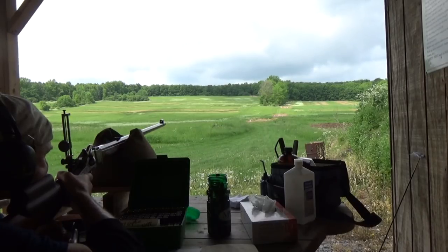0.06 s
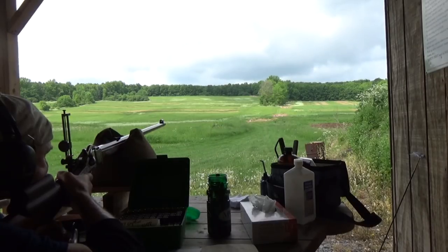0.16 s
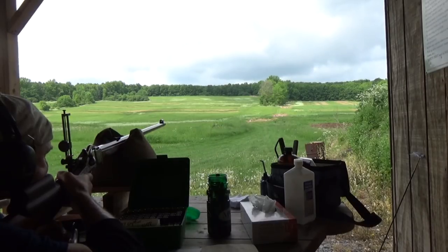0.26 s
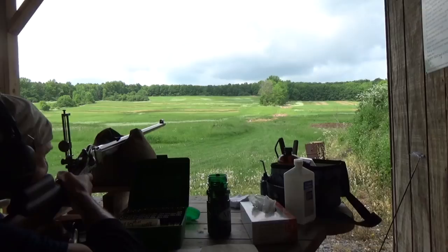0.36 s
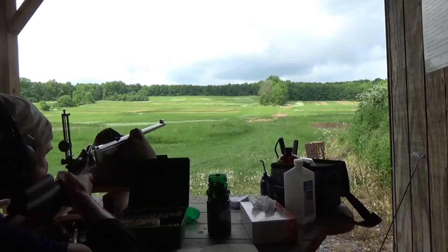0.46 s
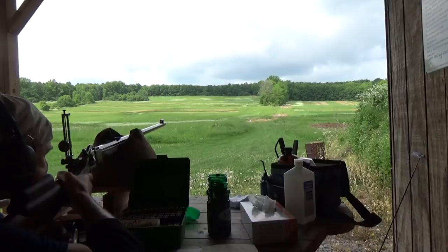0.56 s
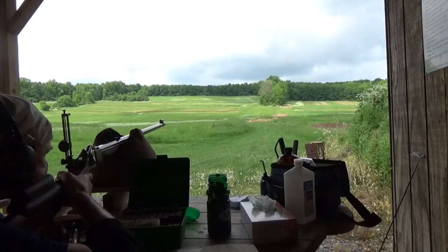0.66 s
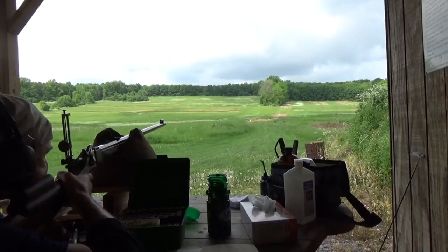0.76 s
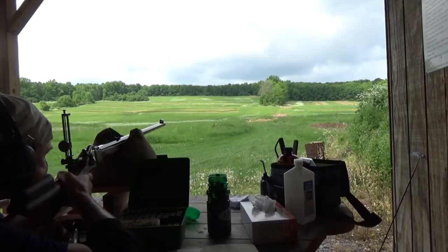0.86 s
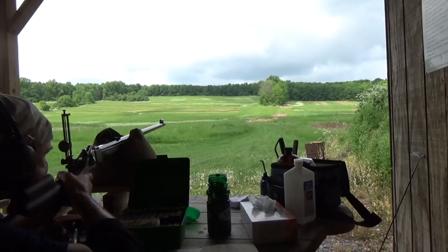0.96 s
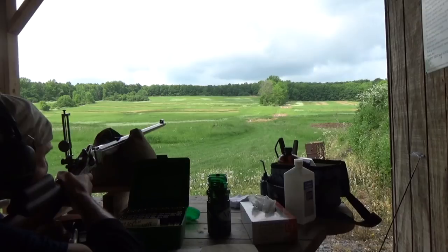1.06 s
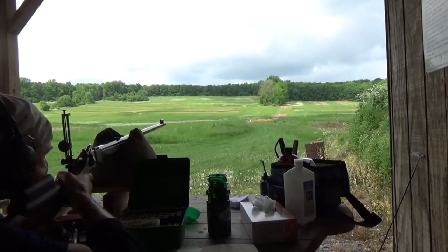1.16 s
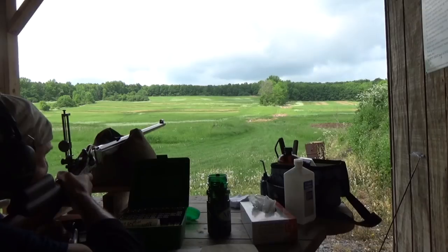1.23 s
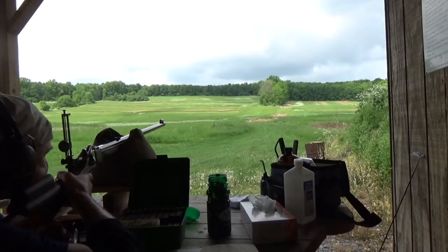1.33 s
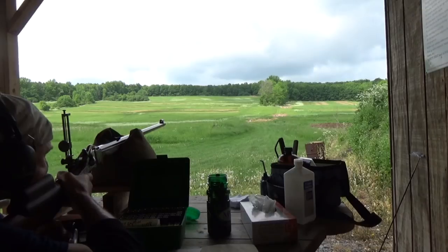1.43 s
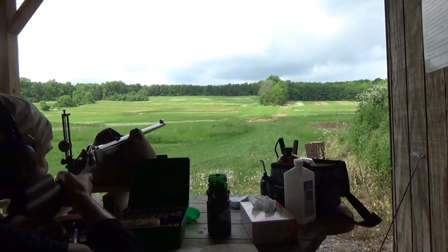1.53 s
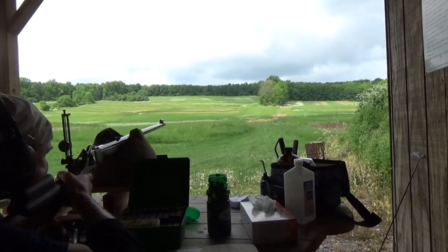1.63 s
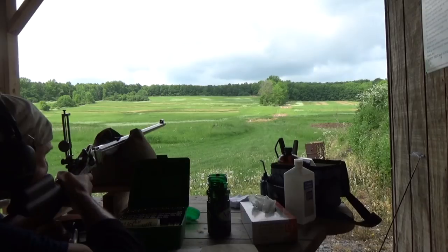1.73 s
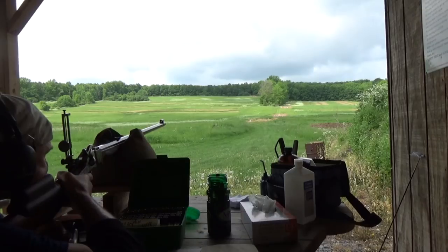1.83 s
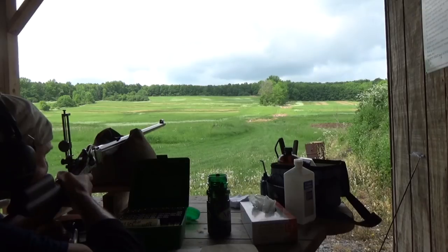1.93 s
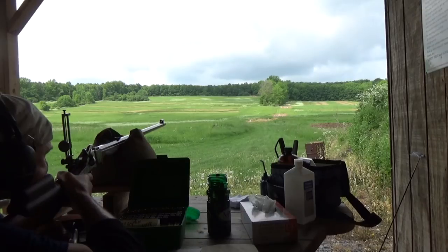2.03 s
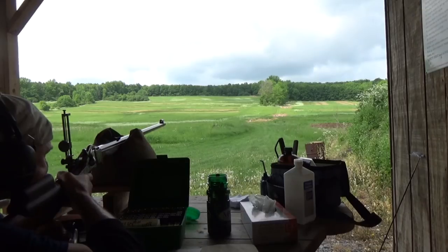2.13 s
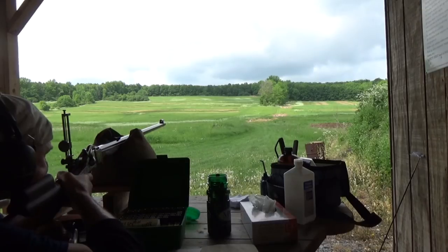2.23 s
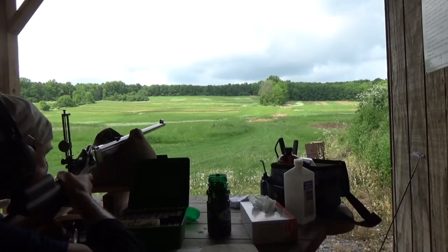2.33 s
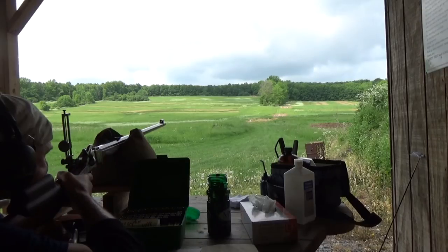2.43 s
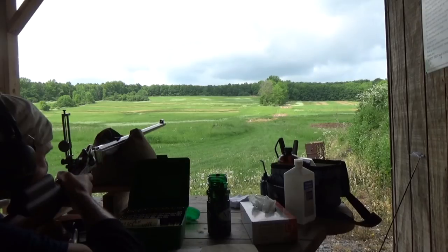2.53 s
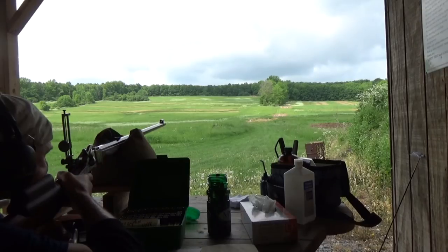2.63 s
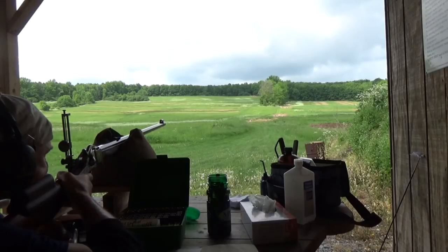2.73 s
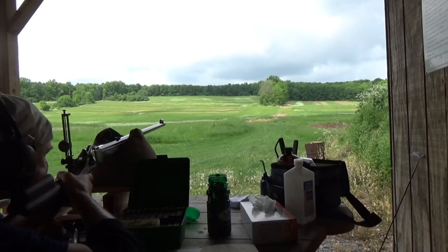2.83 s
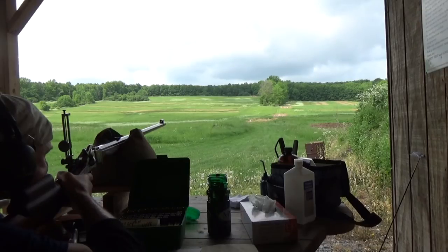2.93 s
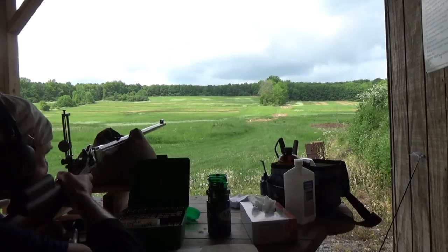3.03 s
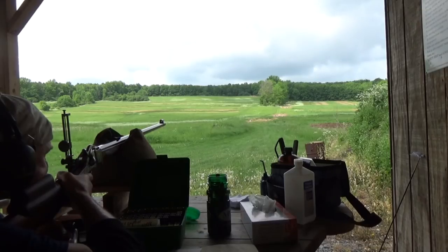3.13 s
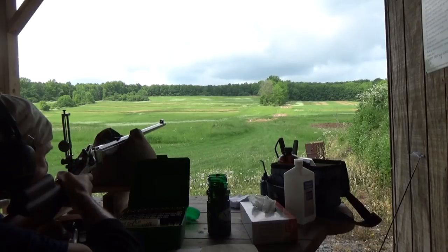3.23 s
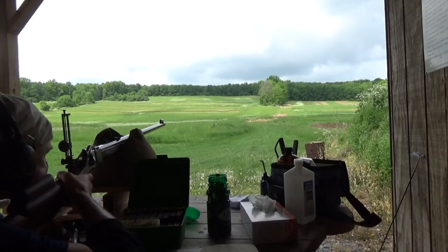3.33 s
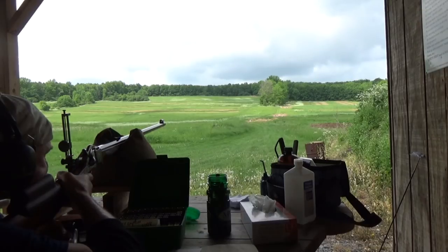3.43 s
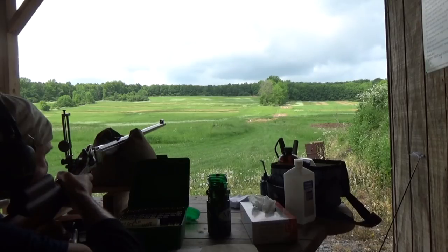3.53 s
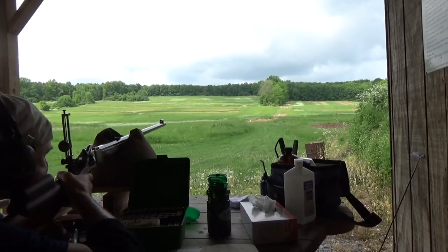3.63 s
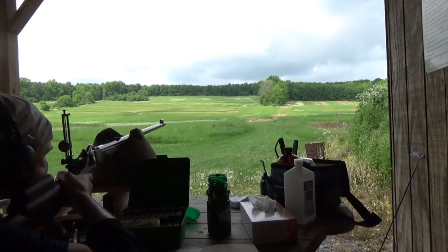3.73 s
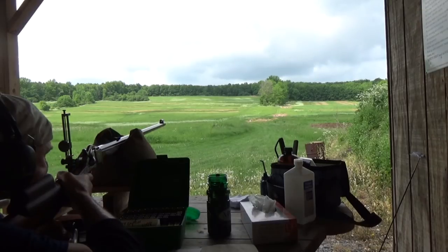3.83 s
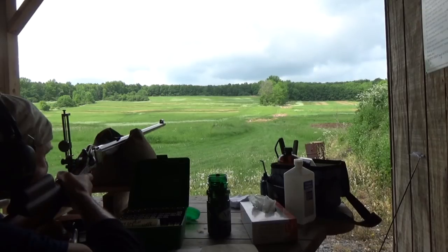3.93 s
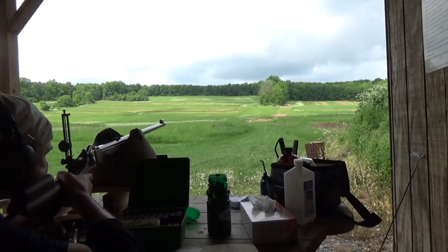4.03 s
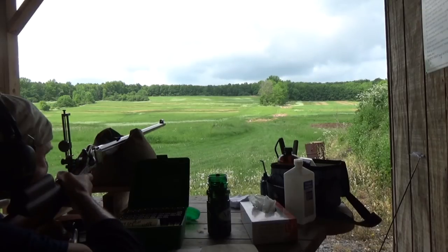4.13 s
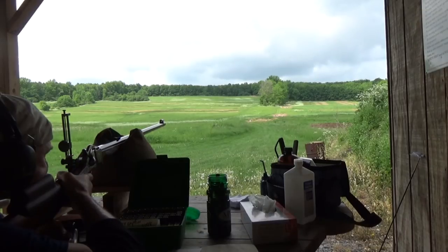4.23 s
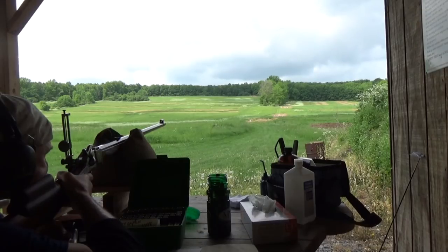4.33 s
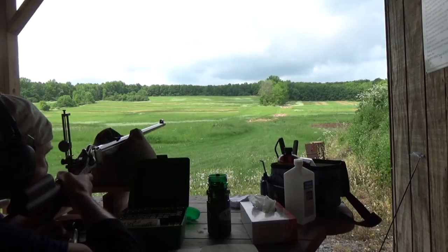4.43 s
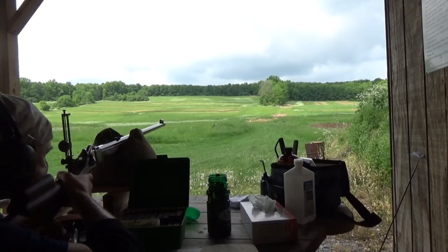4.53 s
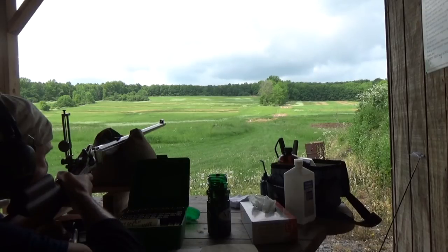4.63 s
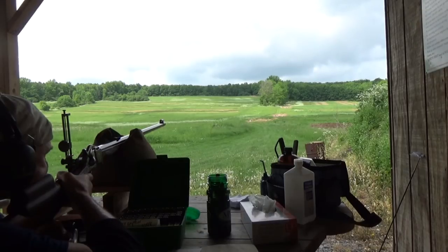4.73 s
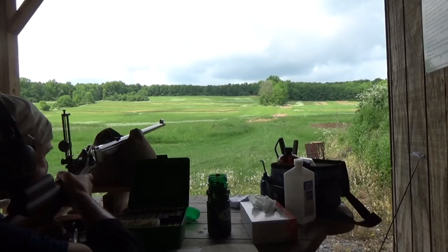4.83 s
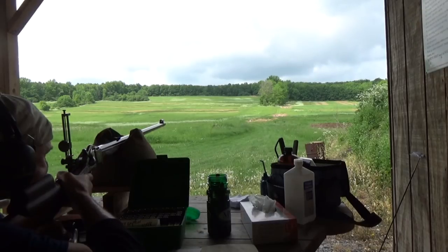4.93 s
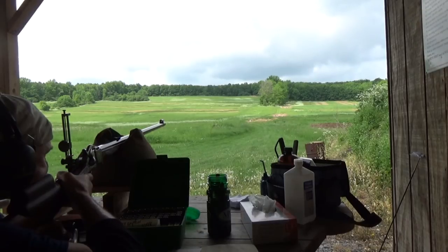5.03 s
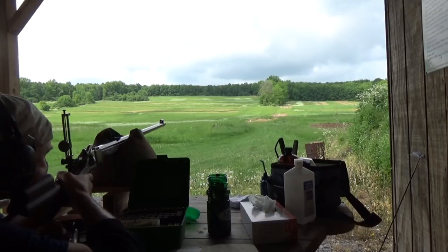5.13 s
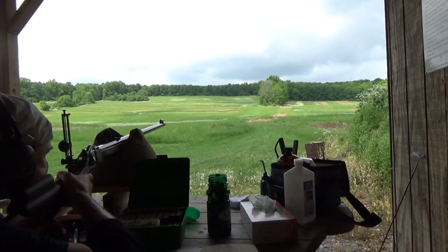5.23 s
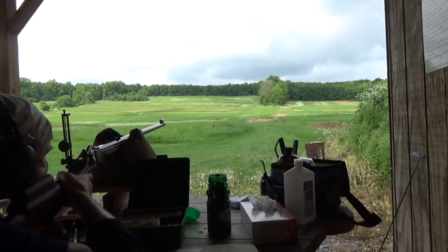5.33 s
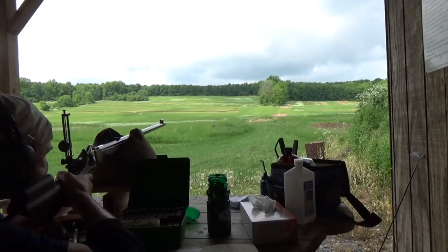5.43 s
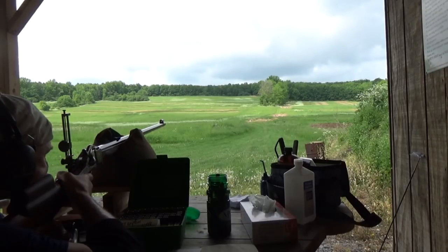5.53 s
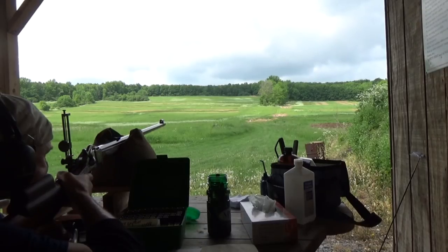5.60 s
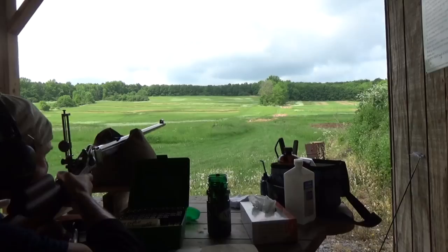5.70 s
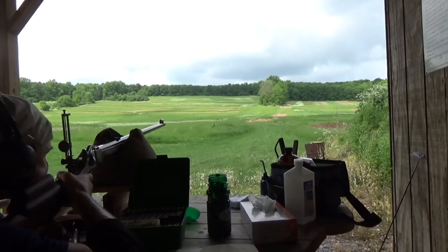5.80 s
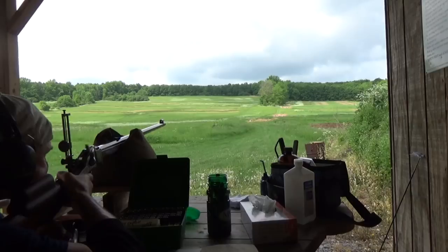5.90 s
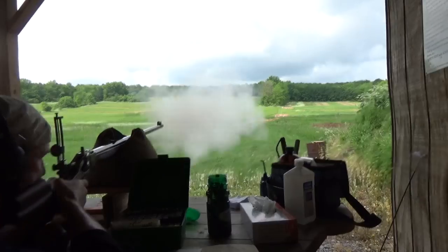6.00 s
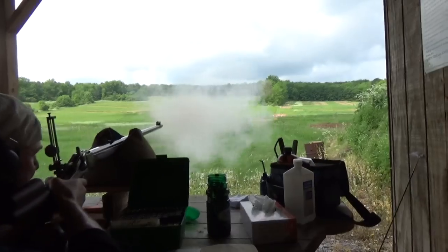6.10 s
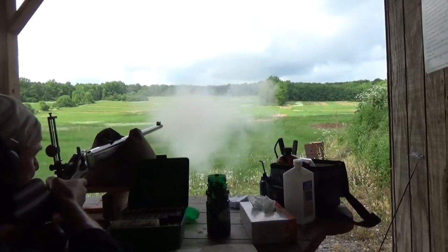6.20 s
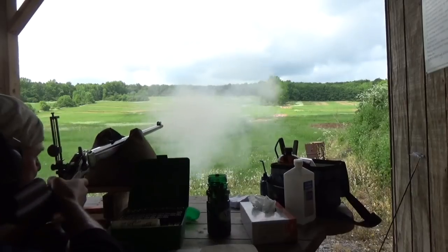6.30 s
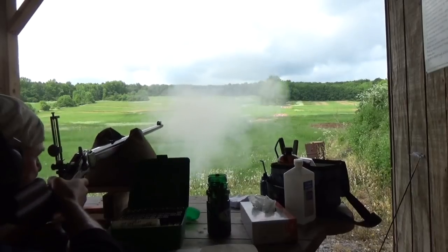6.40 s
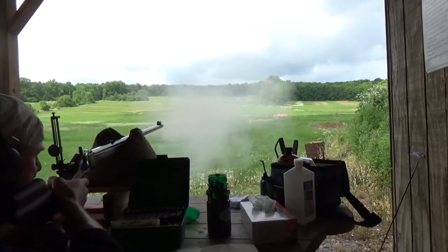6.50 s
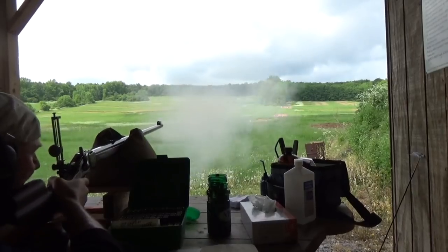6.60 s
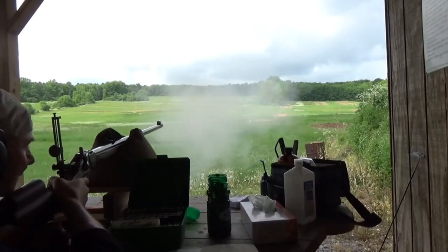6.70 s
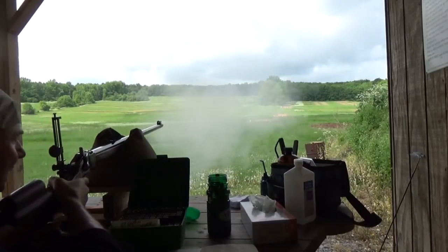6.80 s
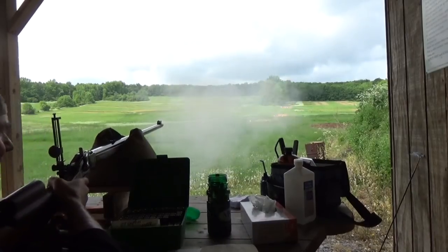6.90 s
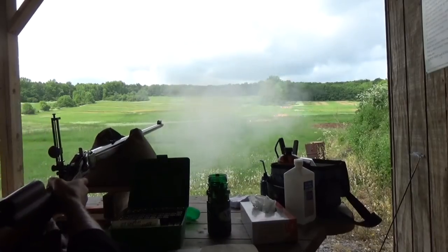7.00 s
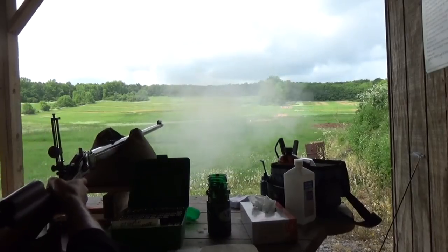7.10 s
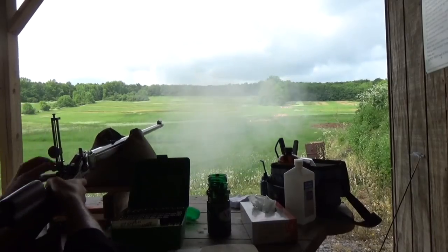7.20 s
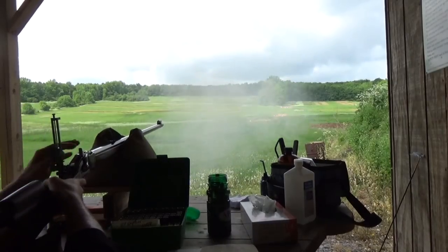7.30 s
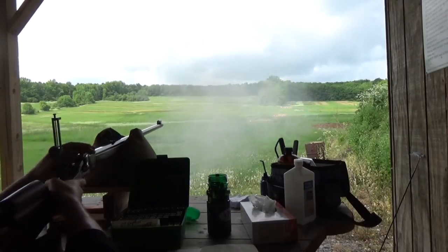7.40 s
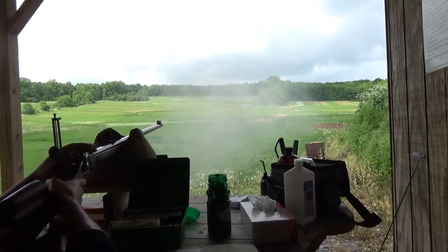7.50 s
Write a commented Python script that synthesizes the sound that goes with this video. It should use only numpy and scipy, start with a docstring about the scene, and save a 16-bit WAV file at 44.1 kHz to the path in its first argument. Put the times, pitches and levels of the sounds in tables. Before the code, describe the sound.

Faint airy hush and birdsong, clear short whistles about every half to one second, distant trills and chatter behind. A sudden, overwhelmingly loud close rifle shot cracks and booms under a timber roof, its noise sweeping out over open grass and returning as sharp slaps and hollow woodland echoes. As it fades, the shooter's clothing rubs, a sleeve drags, metal clicks and a thin whistle flutters. Wide stereo, microphone beside the bench.

```python
"""A black-powder rifle is fired from a wooden shelter on a quiet meadow range. First a songbird whistles short
phrases, others twitter and chip farther off, and the bench is softly bumped. Ignition snaps and the blast,
noise under fast envelopes, rings the shelter's resonances and rolls low. The shock wave sizzles back from the
grass as comb-filtered hiss; sharp hits from down the range and tree-line echoes follow. Last, the shooter's
jacket rubs, a sleeve drags and gear clicks, while a thin whistle flutters."""
import sys
import numpy as np
from scipy import signal
from scipy.fft import rfft, irfft, next_fast_len
from scipy.io import wavfile
from scipy.ndimage import uniform_filter1d, minimum_filter1d, map_coordinates

SR = 44100
rng = np.random.default_rng(int(sys.argv[2]) if len(sys.argv) > 2 else 0)


def unload_wav(signal):
    """Save mono or channel-first audio to the path in sys.argv[1] as 16-bit WAV at rate SR, clipped to [-1, 1]."""
    wavfile.write(
        sys.argv[1],
        SR,
        np.round(np.clip(np.atleast_2d(signal).T, -1, 1) * 32767).astype(np.int16),
    )


N = 332955
T = np.arange(N) / SR   # time [s]
SHOT_S = 5.9015
CUTOFF_HZ = 11050   # top of the recorded band


def from_db(db):
    """Decibels to gain."""
    return 10 ** (np.asarray(db) / 20)


def rms_one(x):
    """Scale to unit power."""
    return x / np.sqrt(np.mean(x ** 2) + 1e-20)


def at_hz(points, hz):
    """Gain of a spectrum at given frequencies, read off along a log frequency axis."""
    knots, db = np.transpose(points)
    return from_db(np.interp(np.log(np.maximum(hz, 1)), np.log(knots), db))


def stereo_white(alike):
    """Two white noises; alike is the correlation between the channels."""
    mid, side = rng.standard_normal((2, N))
    alike = np.clip(alike, 0, .99)
    return (np.sqrt(1 + alike) * mid + np.sqrt(1 - alike) * side * [[1], [-1]]) / np.sqrt(2)


def noise(spectrum, alike):
    """Stereo noise of a given colour, rms 1."""
    size = next_fast_len(N)
    hz = np.arange(size // 2 + 1) * SR / size
    coloured = rfft(stereo_white(alike), size) * at_hz(spectrum, hz)
    return rms_one(irfft(coloured, size)[:, :N])


def resonate(x, hz, width_hz):
    """One resonance, a two-pole ring, rms 1."""
    r = np.exp(-np.pi * width_hz / SR)
    return rms_one(signal.lfilter([1, 0, -1], [1, -2 * r * np.cos(2 * np.pi * hz / SR), r * r], x))


def waver(per_s):
    """Random curve about zero: straight lines between knots of spread 1, per_s knots a second."""
    knots = rng.standard_normal(N // 16)
    return np.interp(T * per_s, np.arange(len(knots)), knots)


def phase_of(hz):
    """Running phase of a pitch curve."""
    return 2 * np.pi * np.cumsum(hz) / SR


def decay(start, t60, rise):
    """Envelope that swells from its start and dies away, 60 dB in t60 seconds."""
    out, on = np.zeros(N), slice(*np.searchsorted(T, [start, start + 2 * t60]))
    age = T[on] - start
    out[on] = (1 - np.exp(-age / rise)) * from_db(-60 * age / t60)
    return out


def surge(start, db, attack, hold, t60, attack_span_db=22):
    """Gain that climbs through the attack span, holds and dies away."""
    out, on = np.zeros(N), slice(*np.searchsorted(T, [start, start + attack + hold + 2 * t60]))
    age = T[on] - start
    climb_db = attack_span_db * np.minimum(age / attack - 1, 0)
    fall_db = 60 * np.maximum(age - attack - hold, 0) / t60
    out[on] = from_db(db + climb_db - fall_db)
    return out


def surges(rows):
    """Overlapping surges add in power."""
    return np.sqrt(sum(surge(*row) ** 2 for row in rows))


def ticks(rows, low_hz, rise=0.00027):
    """Short bursts of band-passed noise, each with its own length and brightness."""
    out, white = np.zeros((2, N)), stereo_white(0.77)
    for start, db, t60, top_hz in rows:
        on = slice(*np.searchsorted(T, [start, start + 2 * t60]))
        age = T[on] - start
        band = signal.butter(2, [low_hz, min(top_hz, CUTOFF_HZ)], "band", fs=SR, output="sos")
        burst = rms_one(signal.sosfilt(band, white[:, on]))
        out[:, on] += burst * (1 - np.exp(-age / rise)) * from_db(db - 60 * age / t60)
    return out


def muzzle_blast(roof_hz=173.2):
    """A bright crack, then the darker boom that builds up under the roof and rings its timbers."""
    # colours of crack, boom, low roll, and the buffeting of each microphone port on its own:
    # (frequency [Hz], relative level per Hz [dB])
    crack_colour = [(60, -54), (400, -6), (1200, -8.5), (3500, -1.5), (5500, -3.5), (8000, -2),
                    (11000, -8.5)]
    boom_colour = [(80, -30), (250, -14), (450, -11.5), (750, -3.5), (1150, -2), (1600, -7.5), (2400, -7.5),
                   (4000, -24), (11000, -25)]
    roll_colour = [(20, -14), (125, -14.5), (200, 1), (320, 0), (500, -7), (1000, -28.5)]
    buffet_colour = [(25, 9), (60, -2), (120, -29), (300, -45)]
    # resonances of the shelter: (frequency [Hz], width [Hz], level [dB])
    shelter_modes = [(590, 35, -27), (791, 84, -22), (1020, 87, -24.5), (1622, 28, -35), (1883, 25, -34),
                     (2232, 25, -35), (2370, 30, -38)]
    # the boom under the roof, then its return from the ground in front:
    # (time [s], level [dB], attack [s], hold [s], t60 [s])
    booms = [(5.902, -13, 0.022, 0.035, 0.4), (6.072, -24.5, 0.019, .015, 0.24)]
    # the low roll, its first swell, then near and far ground: columns as for the boom
    rolls = [(5.902, -27, 0.095, 0.045, 0.26), (5.902, -37, 0.018, 0.29, 1), (6.55, -62, .1, 0.09, 2.1)]
    # the roof's swing: columns as for the boom
    roof_swing = (5.945, -23.5, .065, .035, .15)

    crack = from_db(-6.0) * noise(crack_colour, alike=0.6) * decay(SHOT_S, t60=0.28, rise=0.00041)
    boom = noise(boom_colour, alike=0.46) * surges(booms)

    push = stereo_white(0.7)
    ringing = sum(from_db(db) * resonate(push, hz, width) for hz, width, db in shelter_modes)
    first_ring = surge(SHOT_S, db=-1.5, attack=.037, hold=0.09, t60=0.12)
    long_ring = surge(SHOT_S, db=-24.0, attack=0.045, hold=0.26, t60=0.84)
    timbers = ringing * (first_ring + long_ring)

    # the roof's lowest mode takes a moment to swing up
    roof = np.sin(phase_of(roof_hz + 3 * waver(40))) * surge(*roof_swing)
    buffet = from_db(-14) * noise(buffet_colour, alike=.2)
    roll = (noise(roll_colour, alike=0.93) + buffet) * surges(rolls)
    return crack + boom + timbers + roof + roll


def sharp_snaps():
    """Short, bright noise bursts: ignition ahead of the blast, then a snap from down the range."""
    # (time [s], level [dB], t60 [s], top frequency [Hz])
    snaps = [(5.8895, -15, 0.02, 10100), (5.897, -19.5, 0.041, 11000), (6.4855, -16.5, 0.016, 6770)]
    return ticks(snaps, low_hz=1060)


def grass_scatter(lag_ms=0.482, lag_ms_per_s=0.868):
    """The shock wave scatters from ever farther grass; a lagging ground bounce sweeps a comb downward."""
    # colour of the sizzle: (frequency [Hz], relative level per Hz [dB])
    sizzle_colour = [(150, -45), (700, -16), (1300, -4.5), (2200, -2), (3600, -1.5), (5700, 0), (9000, -1),
                     (11000, -6)]
    # scatter from the near meadow and two farther rises:
    # (time [s], level [dB], attack [s], hold [s], t60 [s])
    grass = [(5.925, -18, 0.098, .11, 0.51), (6.22, -29.5, 0.028, 0.046, 0.28),
             (6.35, -36, 0.043, 0.017, 0.41)]
    # the bounce grows as the shock wave skims ever flatter over the ground: (time [s], share [0-1])
    bounce = [(5.95, 0.33), (6.05, 0.59)]

    hiss = noise(sizzle_colour, alike=0.81) * from_db(1.1 * waver(500))
    lag = (lag_ms + lag_ms_per_s * (T - SHOT_S)) / 1000   # [s]
    bounced = np.array([map_coordinates(side, [(T - lag) * SR], order=3) for side in hiss])
    share = np.interp(T, *np.transpose(bounce))
    return rms_one(hiss + share * bounced) * surges(grass)


def tree_line(grain_db=2.5, patchy_db=1.5):
    """Many trunks return the shot in uneven, hollow clumps: the first, nearest echoes are the brightest."""
    # colours of the stands and of the forest's edge: (frequency [Hz], relative level per Hz [dB])
    stand_colour = [(100, -16), (380, -29), (600, -6), (850, -1.5), (1120, 0.5), (1500, -7), (2400, -8),
                    (4000, -16), (7000, -34), (11000, -33)]
    edge_colour = [(500, -26), (1200, 0.5), (1900, 2), (3000, -3), (5000, -9), (8000, -11), (11000, -23.5)]
    # the hollow ring of the woods: (frequency [Hz], width [Hz], level [dB])
    woods_ring = (1060, 150, -6)
    # echoes from ever farther stands of trees: (time [s], level [dB], attack [s], hold [s], t60 [s])
    stands = [(6.38, -32.5, 0.035, .17, 0.48), (6.42, -30.5, 0.034, 0.042, 0.23),
              (6.66, -40, 0.014, 0.05, 0.98), (6.735, -34.5, 0.013, 0.038, 0.4),
              (6.79, -41, 0.025, 0.073, 0.66), (7.02, -46, 0.038, 0.022, 1), (7.32, -48, 0.05, .02, 0.73)]
    # bright echoes of the forest's edge, then its long scatter: same columns
    edges = [(6.38, -27.5, 0.037, 0.072, 0.51), (6.43, -29.5, 0.034, .04, 0.088),
             (6.6, -48, 0.069, 0.19, 2.3)]

    hz, width_hz, db = woods_ring
    ring = from_db(db) * resonate(stereo_white(0.61), hz, width_hz)
    hollow = noise(stand_colour, alike=0.8) + ring
    body = rms_one(hollow * from_db(patchy_db * waver(90))) * surges(stands)
    grainy = noise(edge_colour, alike=0.45) * from_db(grain_db * waver(970))
    return body + rms_one(grainy) * surges(edges)


def range_hits(pulse_s=0.0002, spread_s_per_s=0.0009):
    """Sharp hits from down the range, each an N-shaped pulse, the later ones longer and duller."""
    # single hard-edged hits from down the range: (time [s], peak level [dB])
    hits = [(6.4508, -6), (6.4855, -5.5), (6.7505, -22)]
    out = np.zeros(N)
    for start, db in hits:
        length = pulse_s + spread_s_per_s * (start - hits[0][0])
        on = slice(*np.searchsorted(T, [start, start + length]))
        out[on] += from_db(db) * (1 - 2 * (T[on] - start) / length)
    return out


def shooter(slips_db=2.5, drag_slips_db=5.0):
    """Elbows bump the bench, the jacket rubs in small slips, a sleeve drags, the gear clicks."""
    # soft bumps on the bench: (time [s], level [dB], t60 [s], top frequency [Hz])
    bump_rows = [(.578, -53, .08, 1500), (.698, -49.5, .17, 1250), (.76, -60.5, 1, 1200),
                 (1.62, -48.5, 0.31, 400), (5.04, -52.5, .27, 700), (5.436, -51, 0.31, 1900),
                 (5.61, -62, .63, 1300), (6.945, -40, 0.2, 700), (7.151, -44, 0.44, 1800)]
    # clicks of rifle and gear: (time [s], level [dB], t60 [s], top frequency [Hz])
    clicks = [(.579, -55, 0.027, 3000), (6.839, -39.5, 0.03, 11100), (7.097, -36.5, 0.022, 10100),
              (7.149, -41.5, 0.13, 11000), (7.4805, -30, 0.01, 4400), (7.495, -43, 0.063, 4660),
              (7.535, -49, 0.043, 5800)]
    # colours of bench and cloth: (frequency [Hz], relative level per Hz [dB])
    bench_colour = [(100, -31), (220, -11.5), (400, -1), (750, 1.5), (1400, -3), (2500, -15), (10000, -31)]
    cloth_colour = [(400, -15), (1300, -5.5), (2300, -1), (3500, 0), (6000, -4), (11000, -18)]
    # strokes of the jacket: (time [s], level [dB], attack [s], hold [s], t60 [s])
    rubs = [(6.55, -54, .11, 0.77, 2.3), (7.06, -50.5, 0.023, 0.13, 0.76), (7.25, -42.5, 0.021, .04, 0.46)]
    # a sleeve drags over the bench: same columns
    drags = [(7.255, -46.5, 0.019, .02, .2), (7.295, -42, 0.014, 0.019, .12)]
    # resonances of the sleeve's folds: (frequency [Hz], width [Hz], level [dB])
    folds = [(1770, 340, -5), (2350, 460, -2.5), (3100, 500, -3)]

    wood, bumps = noise(bench_colour, alike=0.94), 0
    for start, db, t60, top_hz in bump_rows:
        soft = signal.sosfilt(signal.butter(2, top_hz, fs=SR, output="sos"), wood)
        bumps = bumps + soft * from_db(db) * decay(start, t60, rise=0.0056)

    cloth = noise(cloth_colour, alike=0.88) * from_db(slips_db * waver(300))
    rub = rms_one(cloth) * surges(rubs)

    slips = stereo_white(0.83) * from_db(drag_slips_db * waver(400))
    drag = sum(from_db(db) * resonate(slips, hz, width) for hz, width, db in folds)
    return bumps + rub + rms_one(drag) * surges(drags) + ticks(clicks, low_hz=1110)


def among_trees(x, wet_db, t60):
    """Direct sound plus diffuse scatter from foliage, different in each ear."""
    age = T[:SR]
    tail = rng.standard_normal((2, SR)) * from_db(-60 * age / t60)
    tail /= np.sqrt(np.sum(tail ** 2, axis=1, keepdims=True))
    return x + from_db(wet_db) * signal.fftconvolve(x[None], tail, axes=1)[:, :N]


def songbird(burr=0.014, break_hz=2300, rasp=0.19, flutter_db=2.0, warble_per_s=25.7, louder_db_per_octave=8):
    """A nearly pure whistle glides from note to note; pushed too high, it breaks into a rasp."""
    # phrases by name, note by note: (time into the phrase [s], length [s], first pitch [Hz],
    # last pitch [Hz], level [dB], warble depth [Hz])
    phrases = { "zigzag": [(0, .069, 1926, 1970, -9.5, 0), (.046, .029, 2030, 2065, -1.5, 0),
               (.085, .055, 1542, 1728, -6.5, 0), (.12, 0.048, 1695, 1510, -9.5, 0),
               (.21, .087, 1690, 1894, -5, 0), (.295, .075, 1618, 1560, -9.5, 0)],
               "falling": [(0, 0.054, 2020, 2140, -9, 45), (.05, 0.02, 2060, 2135, -1, 0),
               (.085, .05, 2100, 2044, -4, 43), (.137, .082, 1740, 1702, -5, -6),
               (.215, 0.08, 1685, 1665, -8, 2)], "warble": [(0, .092, 1846, 1802, -1.5, 37),
               (.11, 0.013, 2050, 2170, -2.5, 0), (.122, .06, 1685, 1720, -4, 0)],
               "arch": [(0, 0.039, 1760, 1610, -8.5, 0), (.037, 0.039, 1910, 2120, -1, 0),
               (.066, .062, 2020, 1490, -3.5, 0), (.14, 0.074, 1560, 1657, -7, 0),
               (.215, .05, 1660, 1640, -13, 0)], "peak": [(0, .04, 1810, 2000, -5, 0),
               (.04, .0274, 2910, 2670, 0, 0), (.06, .036, 2000, 1510, -4.5, 0)]}
    # the song: (time [s], phrase name, level [dB])
    song = [(0.061, "zigzag", -52), (0.783, "falling", -53.5), (1.722, "warble", -58.5),
            (2.336, "arch", -56), (2.886, "arch", -53), (3.411, "zigzag", -52), (4.172, "warble", -54.5),
            (4.803, "peak", -56.5), (5.338, "arch", -54)]

    out, shake, buzz = np.zeros(N), waver(250), waver(900)
    flutter = flutter_db * waver(120)
    for start, name, song_db in song:
        for delay, length, first_hz, last_hz, db, warble_hz in phrases[name]:
            on = slice(*np.searchsorted(T, [start + delay, start + delay + length]))
            age = T[on] - start - delay
            glide = first_hz + (last_hz - first_hz) * age / length
            pitch = glide - warble_hz * np.cos(2 * np.pi * warble_per_s * age)
            # within a note, higher is louder
            effort_db = louder_db_per_octave * np.log2(pitch / pitch.mean())
            swell = np.sqrt(np.abs(np.sin(np.pi * age / length)))
            loud = from_db(song_db + db + effort_db + flutter[on]) * swell
            pitch = pitch * (1 + burr * shake[on] + rasp * (pitch > break_hz) * buzz[on])
            out[on] += loud * np.sqrt(2) * np.sin(phase_of(pitch))
    return among_trees(out, wet_db=-4.0, t60=0.4)


def chipping_bird(droop=0.158, upper_db=-3):
    """Each chip is a quick, rasping arch; the upper side of the syrinx sings a steeper arch of its own."""
    # harsh chips: (time [s], length [s], level [dB], peak pitch of the upper voice before shake [Hz])
    chips = [(4.462, 0.03, -61, 5550), (4.579, 0.035, -57.5, 5380), (4.71, 0.03, -56.5, 4730),
             (4.892, 0.043, -61, 5440), (5.114, 0.034, -56, 5630)]
    # lower partials of a chip: (peak pitch before shake [Hz], relative level [dB])
    throat = [(2130, -10.5), (3480, -1.5), (4250, -1.5)]

    out, shake = np.zeros(N), 1 + .022 * waver(700)
    rasp = from_db(5 * waver(1500))
    for start, length, db, upper_hz in chips:
        on = slice(*np.searchsorted(T, [start, start + length]))
        arch = (2 * (T[on] - start) / length - 1) ** 2   # 0 mid-chip, 1 at both ends
        bend = (1 - droop * arch) * shake[on]
        lower = sum(from_db(share) * np.sin(phase_of(hz * bend)) for hz, share in throat)
        upper = from_db(upper_db) * np.sin(phase_of(upper_hz * bend ** 2))
        out[on] += from_db(db) * rms_one((lower + upper) * rasp[on] * (1 - arch ** 4))
    return among_trees(out, wet_db=-6.0, t60=0.16)


def slurs(rows):
    """Notes that glide from one pitch to another, some clear and some buzzy."""
    out, shake = np.zeros(N), waver(700)
    for start, length, first_hz, last_hz, db, rough in rows:
        on = slice(*np.searchsorted(T, [start, start + length]))
        part = (T[on] - start) / length
        hz = (first_hz + (last_hz - first_hz) * part) * (1 + rough * shake[on])
        swell = np.sqrt(np.abs(np.sin(np.pi * part)))
        out[on] += from_db(db) * swell * np.sin(phase_of(hz))
    return out


def far_birds():
    """Slurs, trills, a whistle, a rattle and chatter, all blurred by distance."""
    # single slurs: (time [s], length [s], first pitch [Hz], last pitch [Hz], level [dB], roughness [0-1])
    twitter = [(.09, .035, 3700, 4130, -63, 0.03), (.15, 0.042, 4350, 3750, -63, .008),
               (.34, .03, 3850, 4130, -63, .015), (.84, 0.032, 4200, 3600, -66, 0.07),
               (1.11, .09, 4550, 4400, -71, .012), (1.195, .036, 4400, 5400, -60, 0.09),
               (1.27, .045, 4380, 3630, -70, 0.04), (1.738, 0.1, 4640, 3500, -68, .02),
               (2.285, .03, 4650, 4900, -67, .012), (3.35, .17, 4820, 4570, -68, 0.02),
               (3.69, 0.16, 4760, 4570, -66, .035), (4.175, 0.088, 2880, 3000, -63.5, 0.03),
               (4.29, 0.068, 2880, 3020, -60, 0.04), (5.635, 0.024, 4170, 5010, -56, 0.06)]
    # one slurred note repeated: (first time [s], last time [s], nominal spacing [s], note length [s],
    # first pitch [Hz], last pitch [Hz], level [dB], roughness [0-1])
    trills = [(1.863, 2.161, .15, .075, 3480, 2970, -69, .008),
              (2.95, 3.886, .31, 0.13, 2830, 2290, -68.5, 0.03),
              (3.973, 4.601, .103, 0.054, 3620, 3783, -63, 0.06),
              (4.98, 5.263, .094, .036, 3950, 4220, -63, 0.06),
              (5.38, 5.787, .135, 0.028, 4000, 5140, -62.5, 0.09)]
    # one clear far whistle: (time [s], pitch [Hz], level [dB])
    far_whistle = [(2.46, 2540, -64), (2.511, 3030, -65), (2.58, 2905, -65), (2.62, 3010, -54.5),
                   (2.65, 2970, -69)]

    notes = []
    for first, last, spacing, *note in trills:
        count = round((last - first) / spacing) + 1
        notes += [(start, *note) for start in np.linspace(first, last, count)]

    when, hz, db = np.transpose(far_whistle)
    loud = from_db(np.interp(T, when, db, left=-200, right=-200))
    whistle = loud * np.sin(phase_of(np.interp(T, when, hz)))
    together = slurs(twitter) + slurs(notes) + whistle + rattling_bird() + hedgerow()
    return among_trees(together, wet_db=-6, t60=0.16)


def rattling_bird(pulse_db=4, pulses_per_s=42):
    """A distant, dry rattle: coloured noise in pulses half run together."""
    # (time [s], level [dB], attack [s], hold [s], t60 [s])
    rattle = (-0.03, -64.5, 0, 0.36, 0.5)
    # its colour: (frequency [Hz], relative level per Hz [dB])
    rattle_colour = [(2100, -21), (2700, 0.5), (3500, -4), (4000, -10), (5200, -7.5), (5900, -22)]
    pulses = from_db(pulse_db * np.sin(2 * np.pi * pulses_per_s * T))
    return rms_one(noise(rattle_colour, alike=0.43)[0] * pulses) * surge(*rattle)


def hedgerow(count=480, low_hz=3000, high_hz=6500, rough=.02, spread_db=7, steady_db=-72.5):
    """A crowd of faint, quick notes of chance pitch, slope and strength; the farthest merge into a haze."""
    # bouts of chatter over the steady level: (time [s], level [dB], attack [s], hold [s], t60 [s])
    bouts = [(.7, -65, 0.13, 0.24, 1.5), (1.6, -70, 0.13, .25, 4.4)]
    when, length, pitch, slope, near = rng.random((count, 5)).T
    first_hz = low_hz * (high_hz / low_hz) ** pitch
    last_hz = first_hz * (0.8 + 0.28 * slope)
    note_db = spread_db * near - 3 * pitch
    length_s = 0.015 + 0.035 * length
    notes = np.column_stack([when * T[-1], length_s, first_hz, last_hz, note_db, np.full(count, rough)])
    haze = noise([(1800, -20.5), (2700, -2.5), (5400, -7), (7700, -20.5)], alike=0.26)[0]
    busy = np.hypot(from_db(steady_db), surges(bouts))
    return (from_db(-4.5) * rms_one(slurs(notes)) + from_db(-5) * haze) * busy


def meadow(flutter_hz=56, air_db=-64):
    """Soft hiss, a faint far hum, and one thin fluttering whistle after the shot."""
    # still air over the meadow: (frequency [Hz], relative level per Hz [dB])
    air_colour = [(30, -21), (60, -17), (170, -16), (290, -6), (400, -7), (620, -4.5), (1000, -4.5),
                  (1400, -6.5), (4800, -12), (10500, -17.5)]
    air = from_db(air_db) * noise(air_colour, alike=0.43)
    hum = from_db(-77.0) * np.sin(phase_of(628 + 2 * waver(20)))
    flutter = np.sin(2 * np.pi * flutter_hz * T)
    whistle = np.sin(phase_of(3960 + 40 * flutter + 25 * waver(200))) * from_db(4 * flutter)
    return air + hum + whistle * surge(6.83, db=-50, attack=0.055, hold=0.2, t60=1.0)


def scene():
    """Birds a little to the left, the shot nearly straight ahead."""
    birds = (songbird() + chipping_bird() + far_birds()) * from_db([[.9], [-.9]])
    shot = muzzle_blast() + grass_scatter() + tree_line() + range_hits() + sharp_snaps()
    return birds + meadow() * from_db([[.6], [-.6]]) + shot * from_db([[.3], [-.3]]) + shooter()


def record(dry, ceiling_db=-1.0, low_cut_hz=75):
    """A fast limiter holds the blast's peaks; the microphone drops the deep bass and the top is cut."""
    room_left = np.minimum(1, from_db(ceiling_db) / (np.abs(dry).max(axis=0) + 1e-9))
    # about 1 ms of hold and smoothing, the same gain on both channels
    gain = uniform_filter1d(minimum_filter1d(room_left, size=45), size=45)
    low_cut = signal.butter(2, low_cut_hz, "high", fs=SR, output="sos")
    thinned = signal.sosfilt(low_cut, dry * gain)
    return signal.sosfilt(signal.ellip(14, .2, 90, CUTOFF_HZ, fs=SR, output="sos"), thinned)


dry = scene()
out = record(dry)
unload_wav(out)
```